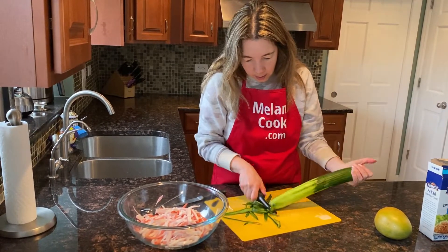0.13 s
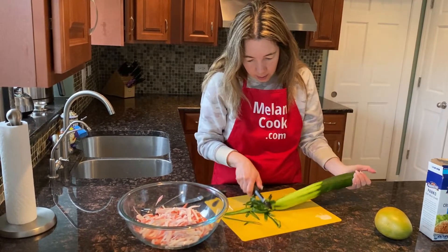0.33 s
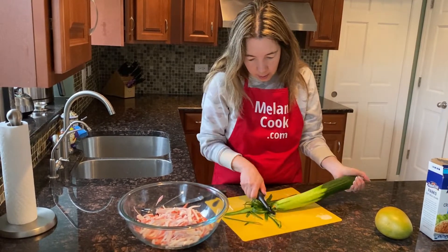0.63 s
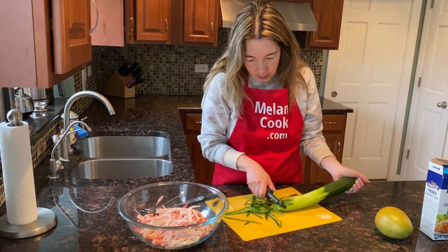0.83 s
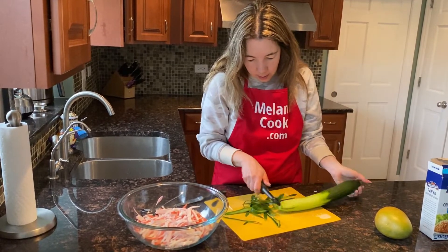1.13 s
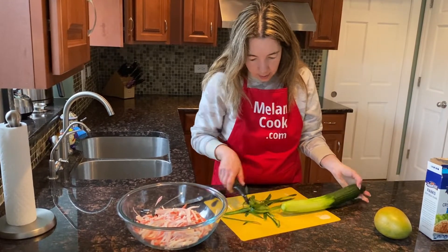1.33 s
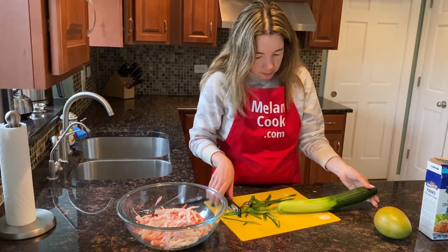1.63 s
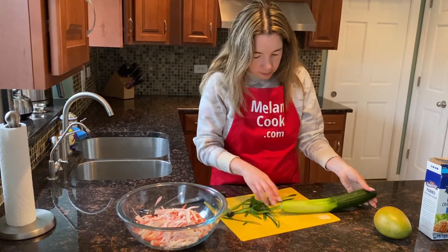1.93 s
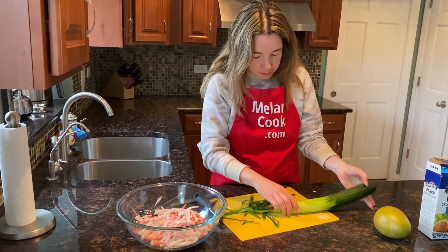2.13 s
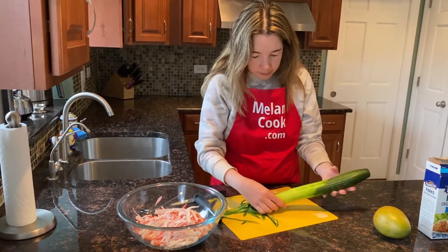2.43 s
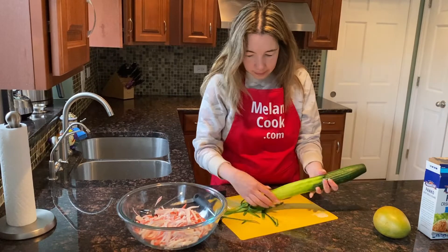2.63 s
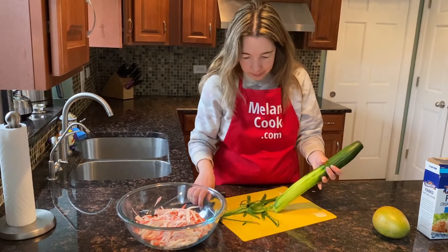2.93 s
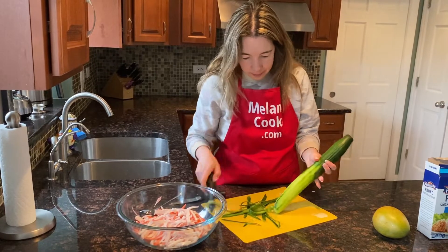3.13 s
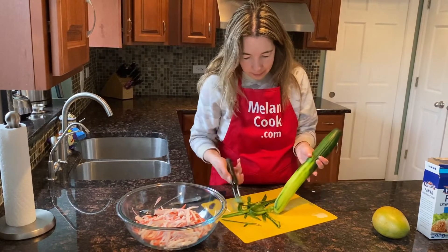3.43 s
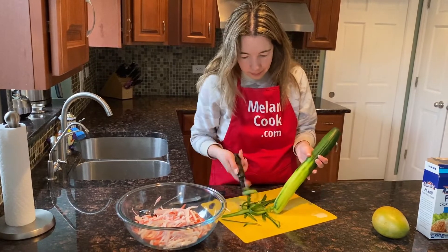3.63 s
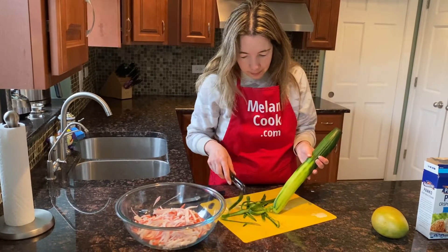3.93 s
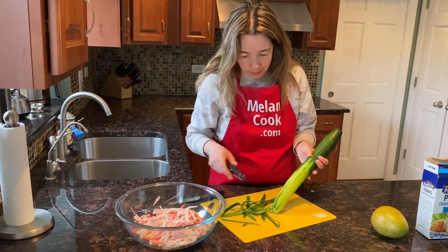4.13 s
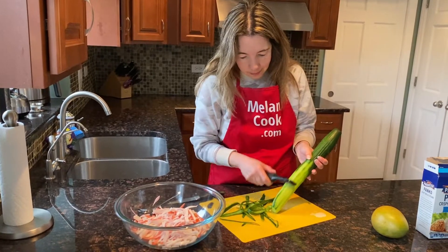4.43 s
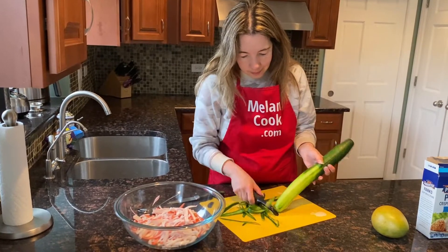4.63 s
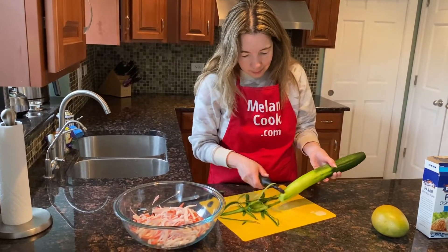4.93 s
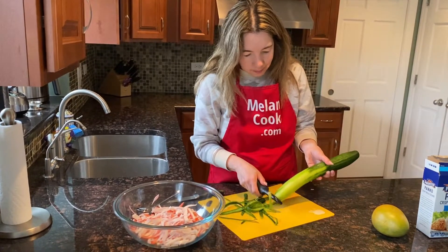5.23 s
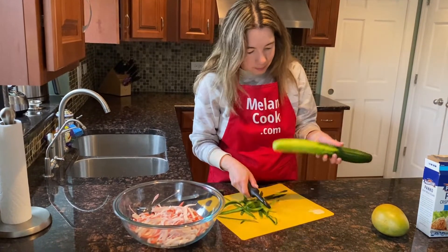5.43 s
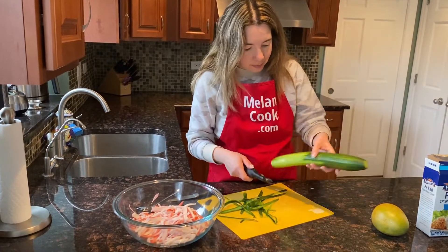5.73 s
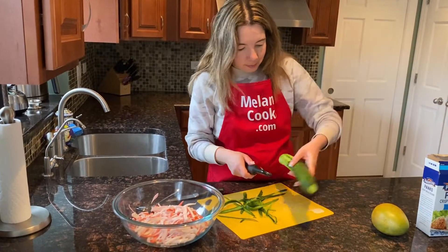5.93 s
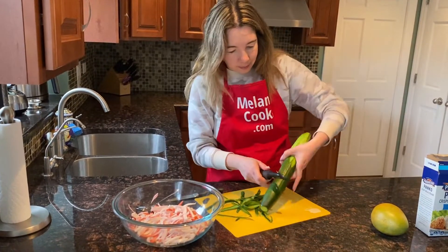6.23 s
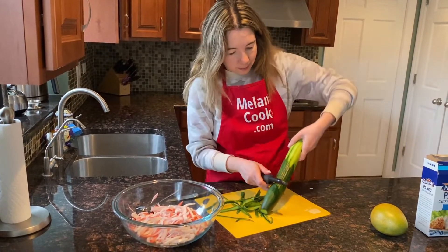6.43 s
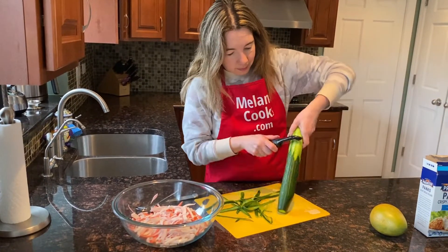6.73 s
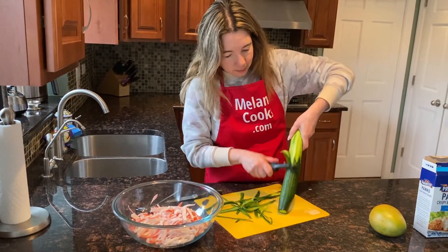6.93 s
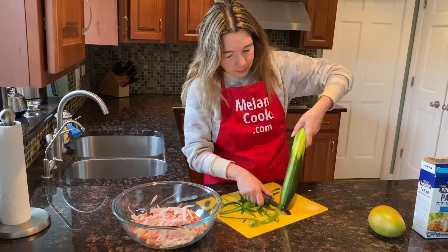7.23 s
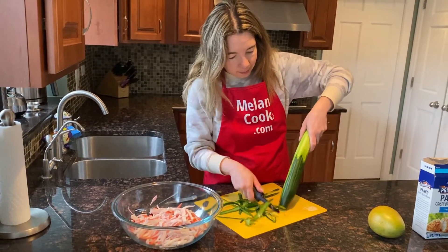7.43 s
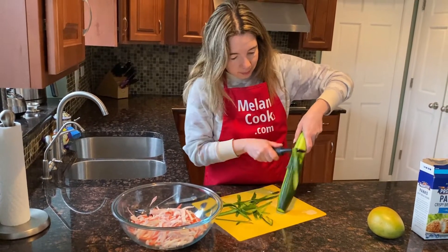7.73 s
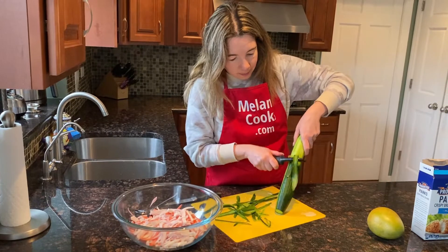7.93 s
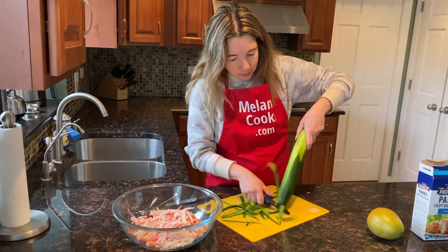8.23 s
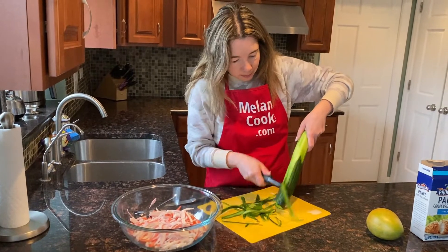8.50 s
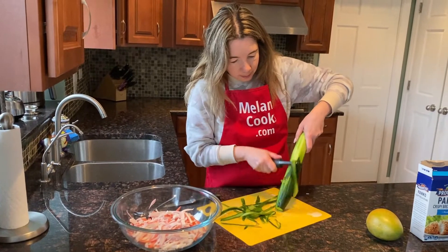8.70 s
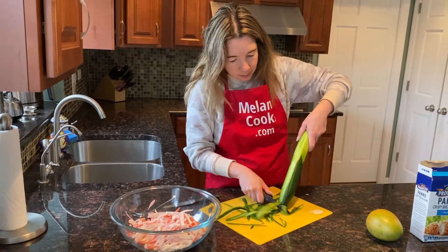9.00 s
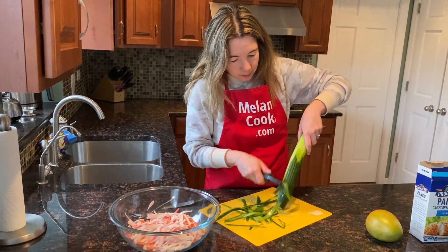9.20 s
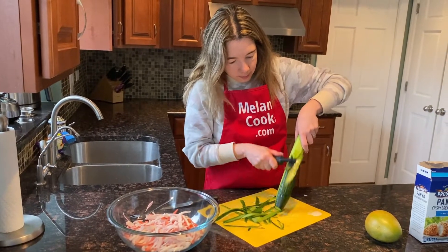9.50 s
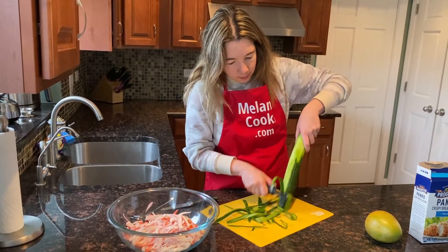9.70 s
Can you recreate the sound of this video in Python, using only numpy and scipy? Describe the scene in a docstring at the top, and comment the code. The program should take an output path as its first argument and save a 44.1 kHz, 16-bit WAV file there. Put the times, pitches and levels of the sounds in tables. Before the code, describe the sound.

A hand peeler ticks, hisses through wet cucumber skin and clacks hard onto a board, with soft rustles and knocks between strokes in a kitchen.

```python
"""A hand peeler strips a cucumber over a plastic board on a stone counter, in a hard-walled kitchen.
First the swivel blade ticks (short resonant noise bursts), hisses through wet skin (dense random grains
through wandering resonances) and the peeler clacks onto the board (damped modes), as after most later strokes.
Then hands rub and rustle through the peels (sparser grains) and lean on the board (low noise swells), and soft
knocks follow (pitched mode clusters). A diffuse reverberant tail and faint room noise lie under it all."""
import sys
import numpy as np
from scipy import signal
from scipy.fft import rfft, irfft
from scipy.io import wavfile

SR = 44100
rng = np.random.default_rng(int(sys.argv[2]) if len(sys.argv) > 2 else 0)


def int16_out(signal):
    """Quantize to a 16-bit WAV file."""
    q = np.round(np.clip(np.atleast_2d(signal).T, -1, 1) * 32767)
    wavfile.write(sys.argv[1], SR, q.astype(np.int16))


N = 434826
TIME = np.arange(N) / SR

# spectrum of the board's low modes: f/Hz, relative density level/dB
BOARD_THUMP = [(90, -17.5), (160, -8), (210, -3.5), (238, 3), (275, -8.5), (330, -2.5), (430, -16.5),
               (800, -27)]
# spectrum of the counter's lowest modes: f/Hz, relative density level/dB
COUNTER_THUD = [(25, -27), (55, 0), (80, 3), (110, -10.5), (300, -30)]


def from_db(db):
    """Amplitude ratio of a level: 20 dB for each factor of ten."""
    return 10 ** (np.asarray(db) / 20)


def rms_one(x):
    """Normalisation to unit effective value."""
    return x / np.sqrt(np.mean(x ** 2) + 1e-20)


def at_hz(points, hz):
    """Interpolation along a logarithmic frequency axis, on which equal intervals are equal ratios."""
    f, value = np.transpose(points)
    return np.interp(np.log(np.maximum(hz, 1)), np.log(f), value)


def coloured(x, colour, ring_hz=1000, ring_db=0, octaves=.2):
    """Linear filtering: the spectrum is multiplied by a response with one optional resonance; rms 1."""
    hz = np.maximum(np.fft.rfftfreq(x.shape[-1], 1 / SR), 1)
    lowest_hz, highest_hz = colour[0][0], colour[-1][0]
    low_skirt = 1 + (lowest_hz / 2 / hz) ** 4
    high_skirt = 1 + (hz / 2 / highest_hz) ** 4
    skirts = 1 / np.sqrt(low_skirt * high_skirt)
    peak_db = ring_db / (1 + (np.log2(hz / ring_hz) / octaves) ** 2)
    response = skirts * from_db(at_hz(colour, hz) + peak_db)
    return rms_one(irfft(rfft(x) * response, x.shape[-1]))


def swell(rise_s, decay_s, size):
    """Exponential build-up and decay of energy after a blow; maximum 1."""
    t = np.arange(size) / SR
    rise = 1 - np.exp(-t / max(rise_s, 1e-5))
    shape = rise * np.exp(-t / max(decay_s, 1e-4))
    return shape / shape.max()


def burst(colour, rise_s, decay_s, **resonant):
    """High modal density: one blow excites crowded damped modes; rows: direct sound, sound into the room."""
    shape = swell(rise_s, decay_s, size=4096)
    direct = rms_one(coloured(rng.standard_normal(len(shape)), colour, **resonant) * shape)
    # summed over all directions, the peaks and gaps of the single modes partly even out
    even = coloured(signal.unit_impulse(len(shape), 128), colour, **resonant)
    radiated = rms_one(even + .35 * direct)
    return np.array([direct, radiated]) * np.sqrt(np.mean(shape ** 2))


def boom(colour, rise_s, decay_s):
    """Slow build-up of low modes of board, counter and room: independent noise in left and right."""
    shape = swell(rise_s, decay_s, size=32768)
    noise = coloured(rng.standard_normal((2, len(shape))), colour)
    return rms_one(noise * shape) * np.sqrt(np.mean(shape ** 2))


def ring(modes, spread_db):
    """Modal superposition: damped sinusoids struck with a new strength each time; two equal rows."""
    t = np.arange(SR // 4) / SR
    tones = []
    for hz, db, t60 in modes:
        strength_db = db + spread_db * rng.standard_normal()
        decay = from_db(strength_db - 60 * t / max(t60, .005))
        tones.append(decay * np.sin(2 * np.pi * hz * t))
    polarity = rng.choice([-1, 1], len(modes))
    return np.tile(polarity @ np.array(tones), (2, 1))


def add(track, s, db, sound):
    """Linear superposition of a two-row sound at a time and gain."""
    start = max(round(s * SR), 0)
    track[:, start:start + sound.shape[1]] += from_db(db) * sound[:, :N - start]


def drift(per_s):
    """Slow random modulation: straight lines between random knots; rms 1."""
    knots = rng.standard_normal(int(N / SR * per_s) + 3)
    return rms_one(np.interp(TIME * per_s, np.arange(len(knots)), knots))


def grains(per_s, spread_db):
    """Shot noise: random clicks of uneven size and either sign."""
    sizes = from_db(spread_db * np.minimum(rng.exponential(1, N), 4))
    return (rng.random(N) < per_s / SR) * sizes * rng.choice([-1, 1], N)


def bands(x, edges):
    """Band-pass analysis into neighbouring bands: (centre Hz, band)."""
    for low, high in zip(edges, edges[1:]):
        band_pass = signal.butter(2, [low, high], "band", fs=SR, output="sos")
        yield np.sqrt(low * high), signal.sosfilt(band_pass, x)


def patchy(x, patchy_db, per_s):
    """Independent random modulation of each band, so the hiss and crackle are uneven in colour; rms 1."""
    edges = np.linspace(10, 130, 22) ** 2
    total = 0
    for k, (_, band) in enumerate(bands(x, edges)):
        # neighbouring bands alternate in sign
        total = total + band * from_db(patchy_db * drift(per_s)) * (-1) ** k
    return rms_one(total)


def resonance(x, centre_hz, width_hz):
    """Heterodyne resonator: shift the moving centre to zero frequency, low-pass, and shift back."""
    turn = np.exp(2j * np.pi * np.cumsum(centre_hz) / SR)
    r = np.exp(-np.pi * width_hz / SR)
    return (turn * signal.lfilter([1 - r], [1, -r], x / turn)).real


def pushes(rows):
    """Sliding gain follows a hand movement that speeds up quickly and slows to a stop."""
    peak_share = 0.15  # part of the length at which the push is fastest
    gain = 0
    for s, length_s, db in rows:
        speed = np.interp((TIME - s) / length_s, [0, peak_share, 1], [0, 1, 0])
        gain = gain + from_db(db) * np.sin(np.pi / 2 * speed)
    return gain


def quiet_house():
    """Stationary background noise over a randomly modulated low rumble."""
    # room noise: f/Hz, relative density level/dB
    room_noise = [(25, -8), (55, 1), (80, -1), (220, -11), (600, -24.5), (2300, -34), (6000, -38),
                  (11000, -31), (13500, -38.5)]
    air = from_db(-66) * coloured(rng.standard_normal((2, N)), room_noise)
    rumble_db = -65.5 + 3.0 * drift(per_s=4.1)
    rumble = from_db(rumble_db) * coloured(rng.standard_normal((2, N)), COUNTER_THUD)
    return air + rumble


def ticks():
    """Impact excitation: the loose blade flips on its stop, peel snaps; free of the skin it rattles on its pivot."""
    # swivel blade flipping and biting, peel snapping: t/s, level/dB before the offset below, f/Hz
    flips = [(0.0603, -36, 3140), (0.2652, -32.5, 2120), (0.827, -25.5, 6770), (1.5, -25.5, 3600),
             (1.6169, -38.5, 2270), (2.021, -38, 3830), (2.249, -49, 3570), (2.9314, -34, 4170),
             (2.946, -28.5, 4000), (3.5264, -46, 4500), (3.5992, -44, 3600), (3.678, -48.5, 3880),
             (3.738, -51, 3640), (3.806, -39.5, 6630), (3.951, -40.5, 4400), (3.9719, -36, 4310),
             (4.1674, -40, 6300), (4.4163, -28, 4426), (5.0012, -20, 5400), (5.057, -36, 4035),
             (5.1184, -32, 3520), (6.115, -22, 2040), (6.307, -31, 3900), (6.691, -26.5, 5420),
             (7.23, -34, 3500), (7.409, -44.5, 2820), (7.758, -40, 6340), (8.3886, -30, 1960),
             (8.66, -25, 5860), (9.402, -30, 5650)]
    # loose blade jingling as the peeler is laid down: t/s, first-bounce gain/dB
    jingles = [(1.737, -57), (1.834, -62.5), (1.927, -61.5), (1.981, -61.5), (2.052, -57)]
    # resonances of the steel blade: f/Hz
    blade_modes = [6260, 11000, 13700]
    # tick spectrum: f/Hz, relative density level/dB
    tick_colour = [(400, -16), (1200, -11.5), (2500, -5.5), (5500, -3.5), (9000, -5.5), (11500, -2),
                   (16000, -12.5)]
    out = np.zeros((2, N))
    for s, db, pitch_hz in flips:
        tick = burst(tick_colour, 0.00077, 0.0041, ring_hz=pitch_hz, ring_db=8.5, octaves=.3)
        add(out, s, db - 10.5, tick)
    bounce_s = 0.0089
    for s, db in jingles:
        for bounce in range(3):
            for hz in blade_modes:
                tinkle = burst(tick_colour, .0005, .005, ring_hz=hz, ring_db=18, octaves=.07)
                add(out, s + bounce * bounce_s, db - 3 * bounce, tinkle)
    return out


def pulls():
    """Cutting effort: a stroke runs up, bites, holds steady and decays as the strip comes free."""
    # blade pulled through the skin: t/s, length/s, run-up/s, steady effort level/dB
    strokes = [(0.076, 0.043, 0.051, -57), (0.522, 0.029, 0.017, -55), (0.822, 0.073, .008, -55.5),
               (4.404, .173, 0.015, -55.5), (6.488, 0.17, 0.14, -67.5), (6.764, 0.47, 0.11, -54.5),
               (7.828, 0.11, .06, -58.5), (8.001, 0.17, 0.14, -52), (8.666, 0.24, 0.15, -53.5),
               (9.437, 0.32, 0.17, -53.5)]
    # the edge meets extra resistance until it is under the skin, so a sudden pull starts with a rasp
    bite_db, bite_s, release_s = 11.5, 0.014, 0.0086
    effort = np.zeros(N)
    for s, length_s, run_up_s, db in strokes:
        t = np.maximum(TIME - s, 0)
        speed = np.sin(np.pi / 2 * np.minimum(t / run_up_s, 1)) ** 2
        release = np.exp(-np.maximum(t - length_s, 0) / release_s)
        effort += from_db(db + bite_db * np.exp(-t / bite_s)) * speed * release
    return effort


def slicing():
    """Shot noise of bursting cells merges into a hiss; damped blade resonances wander with the load."""
    # hiss of the wet skin: f/Hz, relative density level/dB
    skin_colour = [(150, 1), (650, -4), (1050, -24), (1600, -4), (2500, -10), (3300, -4), (5000, 2.5),
                   (7300, -0.5), (11600, 5.5), (15300, 0.5), (16000, -11)]
    # mean resonances of the blade while it is loaded by the skin: f/Hz
    loaded_blade = [2500, 4470, 5805, 7300]
    cells = patchy(grains(per_s=2800, spread_db=3.2), patchy_db=3.1, per_s=36)
    resonant = 0
    for hz in loaded_blade:
        centre_hz = hz * (1 + .05 * drift(per_s=11))
        strength = from_db(3 * drift(per_s=18))
        resonant = resonant + strength * resonance(cells, centre_hz, width_hz=260)
    catching = from_db(1.3 * drift(per_s=170))  # the blade catches unevenly
    hiss = coloured(cells, skin_colour) + from_db(-7) * rms_one(resonant)
    return pulls() * catching * hiss


def strikes():
    """Impact response: after a faint click the frame clicks, the board clacks, rebounds and thumps."""
    # peeler striking the board: t/s, reference level/dB, clack re reference level/dB, frame f/Hz
    blows = [(0.126, -11, -15.5, 2200), (0.549, -4, -18, 1496), (0.894, -4.5, -21, 3732),
             (4.593, -4, -24, 3800), (4.605, -20.5, -11, 1937), (8.224, -2, -25.5, 4690),
             (8.931, -7.5, -25, 2120), (9.767, -4.5, -21.5, 4630)]
    # frame click: f/Hz, relative density level/dB
    click_colour = [(400, -23), (1200, -6), (2800, -3), (4900, -2), (6500, -4.5), (11300, -3.5),
                    (14000, -10.5), (15100, -14), (16000, -22.5)]
    # board clack: f/Hz, relative density level/dB
    clack_colour = [(250, -20.5), (500, -5), (800, -12.5), (1100, -8), (1450, 0.5), (1750, -1.5),
                    (2400, -0.5), (3200, -15), (6000, -28)]
    # modes of the peeler on the board: f/Hz, mean relative level/dB, t60/s
    peeler_modes = [(1323, -11, 0.19), (1516, -6, .07), (1972, -3, 0.13), (2338, -0.5, 0.037),
                    (3740, -6, .04), (4610, -1, 0.057), (11000, -1.5, .03), (15030, -4, .04)]
    upright_from_s = 6.1
    hit, body = np.zeros((2, 2, N))
    for s, db, clack_db, ring_hz in blows:
        # a faint click just before each blow
        faint_click = burst(click_colour, 0.00041, 0.0028, ring_hz=ring_hz, ring_db=1.5, octaves=.2)
        add(hit, s - .009, db - 36.0, faint_click)
        click = burst(click_colour, 0.00033, 0.005, ring_hz=ring_hz, ring_db=6.0, octaves=0.14)
        add(hit, s + .001, db - 11.5, click)
        clack = burst(clack_colour, 0.00013, 0.0084, ring_hz=ring_hz, ring_db=4.5, octaves=0.19)
        add(hit, s + .001, db + clack_db - 2.5, clack)
        rebound = burst(clack_colour, 0.00033, .005)
        add(hit, s + .012, db - 24, rebound)
        add(hit, s + 0.0022, db - 24, ring(peeler_modes, spread_db=2.5))
        # the thump comes from the weight of the hand, so it grows only half as fast as the click
        add(body, s, -35 + .5 * db, boom(BOARD_THUMP, 0.032, .06))
        # the cucumber, once stood on end, carries more of the blow into the counter
        thud_db = db - 44.5 + 11.5 * (s > upright_from_s)
        add(body, s, thud_db, boom(COUNTER_THUD, 0.069, 0.11))
    return hit, body


def sweeping():
    """Friction as shot noise: wet peels crackle while the rubbing hand wakes a hollow resonance."""
    # wet peels pushed aside or dropped: t/s, length/s, level/dB before the offset below
    rustles = [(1.53, 0.18, -50), (2.24, .14, -53.5), (5.3, 0.04, -55.5), (6.33, 0.075, -57),
               (7.36, 0.11, -51)]
    # hand and cucumber sliding on the board: t/s, length/s, level/dB before the offset below
    rubs = [(0.46, 0.13, -46.5), (1.17, 0.23, -60), (1.97, 0.31, -44), (4.41, 0.14, -52),
            (6.17, 0.27, -55.5), (7.24, 0.15, -60.5)]
    # spectrum of the peels: f/Hz, relative density level/dB
    rustle_colour = [(900, -6.5), (1500, 2), (3200, 1.5), (6000, -7), (16000, -19.5)]
    # spectrum of the rubbing: f/Hz, relative density level/dB
    rub_colour = [(120, 9.5), (300, 8), (550, -2.5), (950, -8), (3000, -16)]
    crackle = patchy(grains(per_s=1100, spread_db=1.3), patchy_db=2.0, per_s=15)
    rustle = from_db(-3) * pushes(rustles) * coloured(crackle, rustle_colour)
    friction = grains(per_s=710, spread_db=2.5)
    hollow = coloured(friction, rub_colour, ring_hz=810, ring_db=6.5, octaves=0.046)
    return rustle + from_db(-10.5) * pushes(rubs) * hollow


def leaning():
    """Low-frequency forced response: hand weight shifts on the board and the counter answers with a swell."""
    # hands leaning on the board, cucumber shifting its weight: t/s, length/s, peak gain/dB
    leans = [(1.2, 0.29, -52), (6.38, 0.24, -54), (7.95, 0.45, -59), (9.25, 0.28, -67)]
    return pushes(leans) * coloured(rng.standard_normal((2, N)), COUNTER_THUD)


def knocks():
    """Position-dependent modal excitation: the spot hit sets the pitch of a cluster of short modes."""
    # cucumber, hand and handle bumping the board; levels are before the offsets below:
    # t/s, knock level/dB, counter thud level/dB, board thump level/dB, f/Hz
    bumps = [(1.443, -30, -74, -66, 1630), (1.5, -34.5, -70, -42, 760), (1.75, -45.5, -66, -50.5, 730),
             (2.077, -35, -72, -57.5, 990), (2.194, -37, -70, -57.5, 1070),
             (2.778, -44.5, -76, -64.5, 1060), (2.891, -33.5, -56, -50.5, 716),
             (2.944, -32, -69, -57.5, 1490), (3.474, -50.5, -83, -71, 1560),
             (3.889, -49.5, -87.5, -88, 1680), (5.058, -42, -77, -70, 1170), (5.099, -35, -51.5, -60, 1200),
             (5.346, -29.5, -72, -63.5, 1340), (6.109, -30, -42, -48.5, 1280),
             (6.301, -38, -48.5, -59.5, 1300), (7.193, -37, -39.5, -63.5, 2170)]
    # spectrum of a soft knock: f re its pitch (ratio), relative density level/dB
    knock_colour = [(.3, -16), (.6, -4.5), (1, 3), (1.7, -6), (2.7, -14), (9, -25)]
    # hollow modes of the board: f/Hz, mean relative level/dB, t60/s
    board_modes = [(243, 0, 0.45), (482.6, -1.5, 0.4), (719, -0.5, 0.57), (775, -5, 0.4)]
    hit, body = np.zeros((2, 2, N))
    for s, db, thud_db, thump_db, pitch_hz in bumps:
        cluster = [(hz, 0, 26 / hz) for hz in pitch_hz * np.geomspace(.76, 1.16, 5)]
        colour = [(multiple * pitch_hz, level_db) for multiple, level_db in knock_colour]
        add(hit, s, db - 7.0, burst(colour, 0.00025, 0.0054))
        add(body, s + 0.00094, db - 21, ring(cluster, spread_db=3.5))
        add(body, s, thump_db - 5.5, ring(board_modes, spread_db=1.5))
        add(body, s, thump_db + 0.5, boom(BOARD_THUMP, 0.014, 0.08))
        add(body, s, thud_db, boom(COUNTER_THUD, 0.038, 0.08))
    return hit, body


def kitchen(x):
    """Diffuse-field reverberation: noise tails, independent at each ear, decay faster in the treble."""
    # reverberation time of the kitchen: f/Hz, t60/s
    reverberation = [(260, 0.74), (700, 0.4752), (1840, 0.55), (4850, 0.45), (13000, 0.28)]
    t = np.arange(SR) / SR
    edges, tail = np.geomspace(40, 17000, 15), 0
    for k in range(len(edges) - 1):
        (hz, band), = bands(rng.standard_normal((2, SR)), edges[k:k + 2])
        tail = tail + band * np.exp(-np.log(1000) * t / at_hz(reverberation, hz))
    build_up_s = 0.0019
    build_up = 1 - np.exp(-(t / build_up_s) ** 2)
    tail = rms_one(tail * build_up) / np.sqrt(SR)
    return signal.fftconvolve(x[None], tail, axes=1)[:, :N]


def scene():
    """Superposition of direct and reverberant fields; each source feeds the room at its own gain."""
    (strike, strike_out), strike_body = strikes()
    (knock, knock_out), knock_body = knocks()
    (blade, blade_out), hiss, sweep = ticks(), slicing(), sweeping()
    board_to_room = from_db(-2.0) * strike_out + from_db(5.0) * knock_out + from_db(-1.5) * sweep
    blade_to_room = from_db(0.5) * blade_out + hiss
    direct = strike + knock + blade + hiss + sweep
    low_modes = strike_body + knock_body + leaning()
    return direct + low_modes + kitchen(board_to_room + blade_to_room) + quiet_house()


def record(dry):
    """Mid-side stereophony: narrow in the bass, treble nearly mono apart from a turning phase."""
    # stereo width: f/Hz, side gain/dB
    width = [(60, -18), (125, -12), (250, -9.5), (1200, 1), (2000, -3), (6000, -4), (7200, -34.5)]
    hz = np.fft.rfftfreq(N, 1 / SR)
    left, right = rfft(dry)
    mid = (left + right) / 2
    side = (left - right) / 2 * from_db(at_hz(width, hz))
    # raises the left and lowers the right by the same level: f/Hz, level/dB
    lean = from_db(at_hz([(250, 1.2), (1000, .1), (2200, .9), (5000, .9), (7000, .1)], hz))
    # above 7150 Hz the left channel's phase turns steadily against the right
    phase_turn = np.exp(-2j * np.pi * np.maximum(hz - 7150, 0) * .000243)
    pair = irfft(np.array([(mid + side) * lean * phase_turn, (mid - side) / lean]), N)
    cutoff_hz = 16300
    low_pass = signal.ellip(10, .3, 80, cutoff_hz, fs=SR, output="sos")
    return signal.sosfilt(low_pass, pair)


dry = scene()
out = record(dry)
int16_out(out)
```